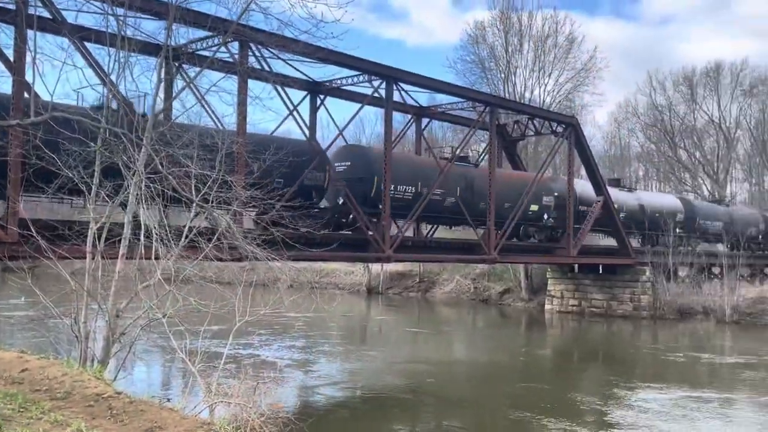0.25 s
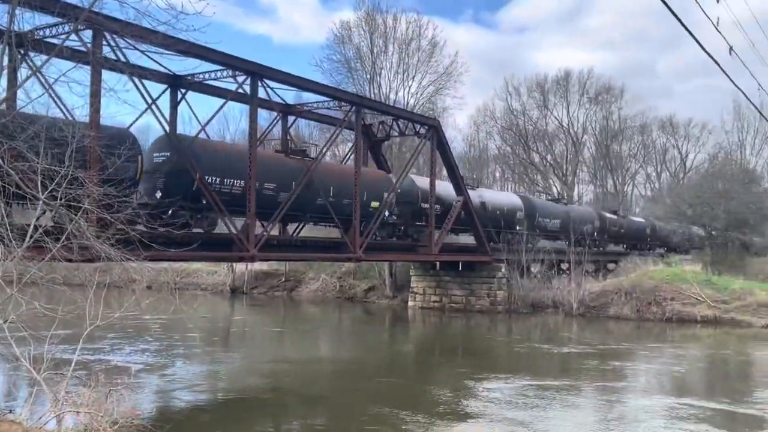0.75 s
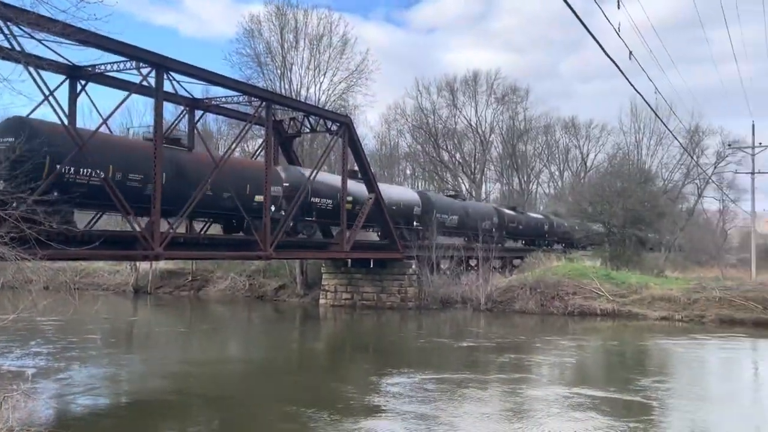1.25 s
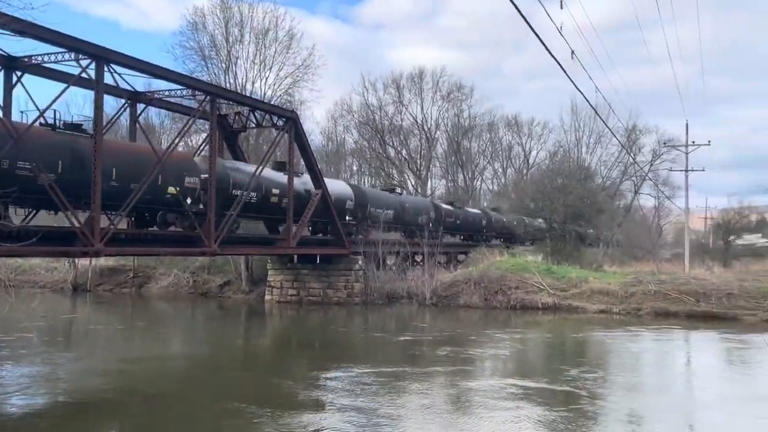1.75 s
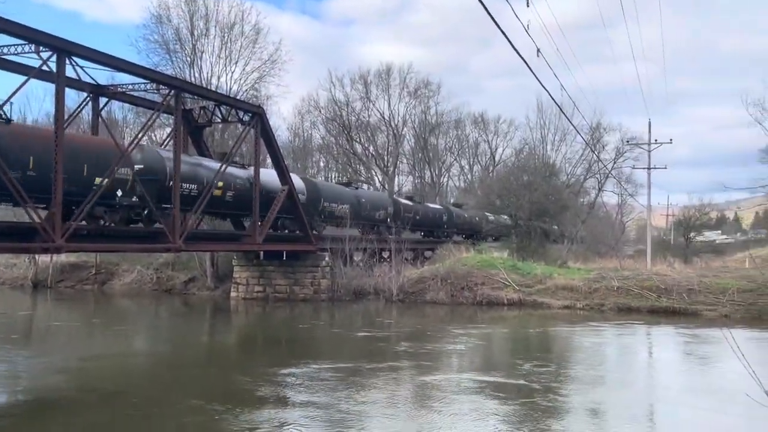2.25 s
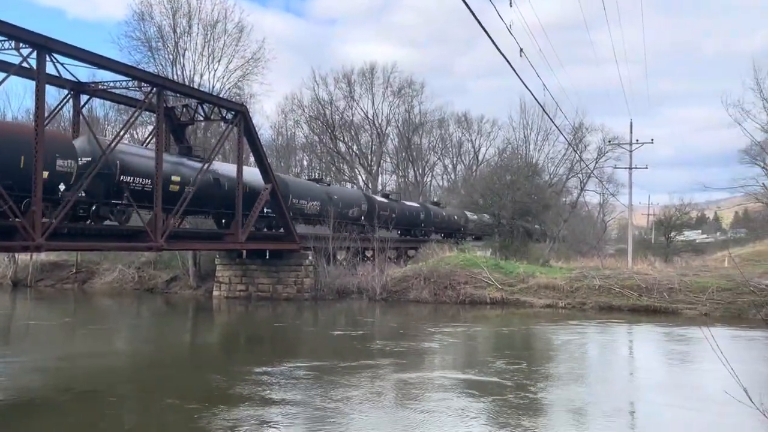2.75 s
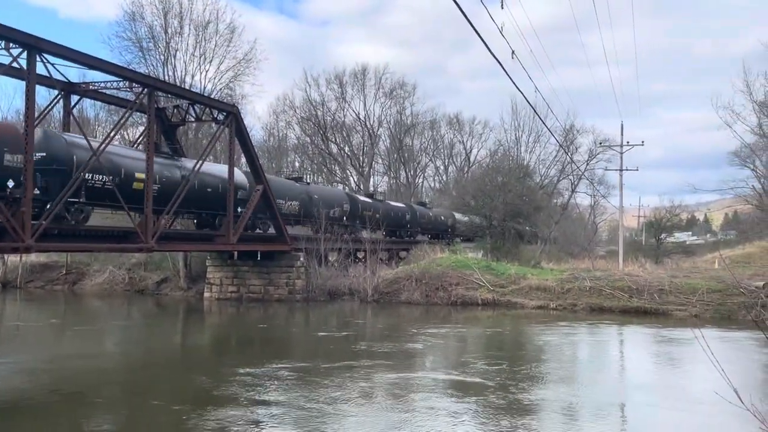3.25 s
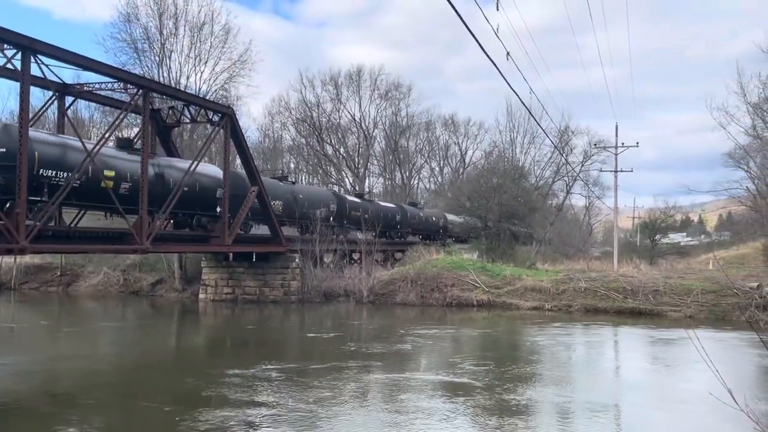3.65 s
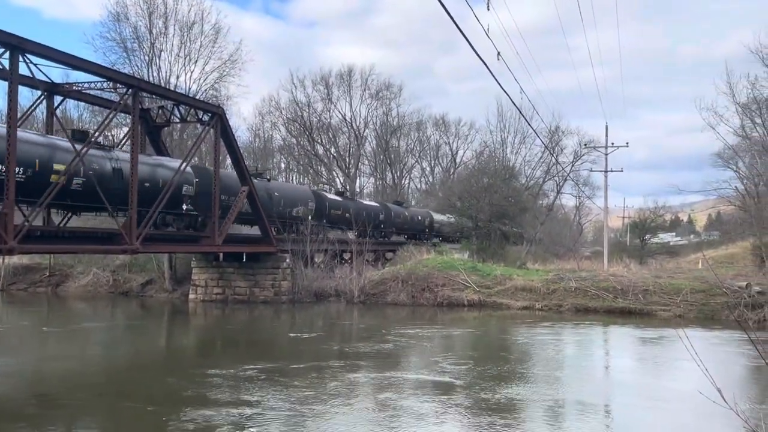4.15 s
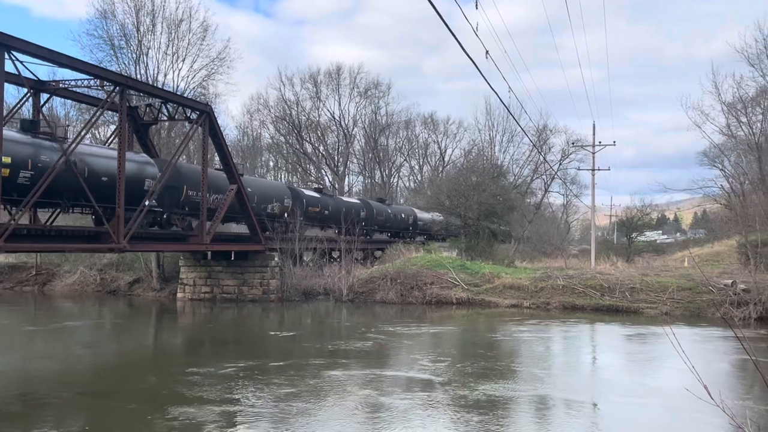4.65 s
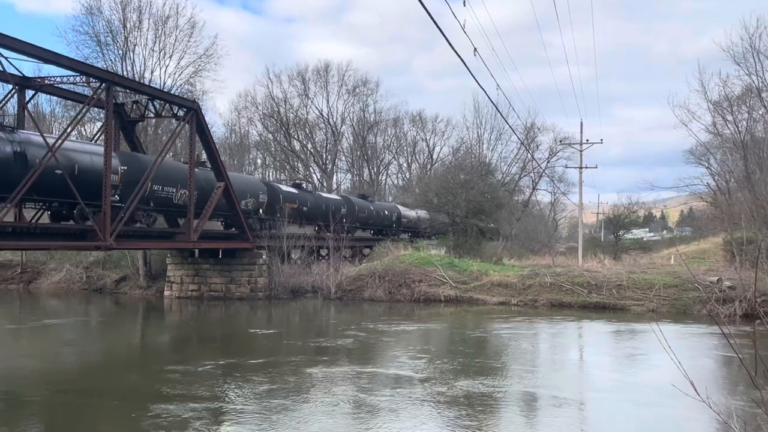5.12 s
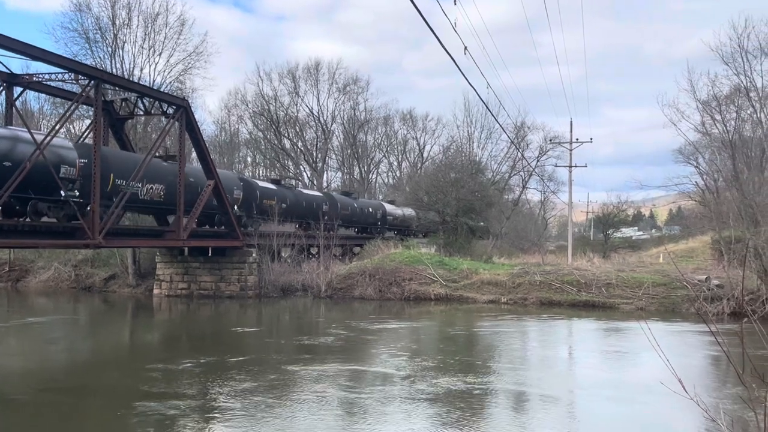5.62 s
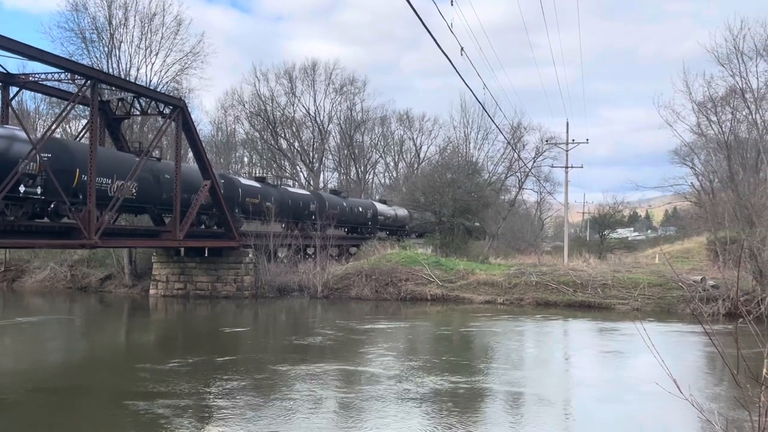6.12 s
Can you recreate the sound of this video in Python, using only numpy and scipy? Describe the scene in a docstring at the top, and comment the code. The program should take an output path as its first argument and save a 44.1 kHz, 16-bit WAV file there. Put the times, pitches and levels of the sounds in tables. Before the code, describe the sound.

A freight train of tank cars rolls across a steel bridge, heard outdoors from the river bank. A steady low rumble and wheel roar carry on throughout, with surges of metallic scraping and hiss, irregular clanks and light rattles. One hard knock stands out about a second in. Later the rumble swells with a cluster of clanks, and a faint, thin squeal follows near the end.

```python
"""On a river bank, a train of tank cars is heard rolling over a steel truss bridge.
Rough wheels and rails force the girders, running gear and wheels into vibration; sliding flanges scrape,
hiss and, by stick-slip, briefly squeal. Impacts excite free vibration: axles clank over rail joints,
couplers clink, loose chains rattle, and one hard knock stands out. The far bank scatters it all."""
import sys
import numpy as np
from scipy import signal
from scipy.fft import rfft, irfft
from scipy.io import wavfile
from scipy.ndimage import uniform_filter1d, map_coordinates

SR = 44100
rng = np.random.default_rng(int(sys.argv[2]) if len(sys.argv) > 2 else 0)


def wav_record(signal):
    """Record a signal, one row per channel, as 16-bit PCM in the file named by sys.argv[1]."""
    frames = np.transpose(np.atleast_2d(signal))
    bounded = np.clip(frames, -1, 1)
    # unit amplitude maps onto the largest positive 16-bit level
    quanta = np.round(bounded * 32767).astype(np.int16)
    wavfile.write(sys.argv[1], SR, quanta)


N = 281259
TIME = np.arange(N) / SR
FREQ = np.maximum(np.fft.rfftfreq(N, 1 / SR), 1)


def undb(db):
    """Decibels to amplitude ratio."""
    return 10 ** (np.asarray(db) / 20)


def unit(x):
    """Normalisation to rms 1."""
    return x / np.sqrt(np.mean(x ** 2))


def colour(x, spectrum):
    """Filtering by a spectral envelope of (f/Hz, level/dB) points."""
    hz, db = np.transpose(spectrum)
    return irfft(rfft(x) * undb(np.interp(np.log(FREQ), np.log(hz), db)), N)


def band(x, hz, width):
    """Second-order resonance with gain 1 at its centre."""
    return signal.lfilter(*signal.iirpeak(hz, hz / width, fs=SR), x)


def walk(cutoff_hz):
    """Random fluctuation: low-pass noise of rms 1."""
    return unit(irfft(rfft(rng.standard_normal(N)) / (1 + (FREQ / cutoff_hz) ** 4), N))


def free_modes(hz, t60_s, detune, t):
    """Free vibration: one damped sinusoid per mode, randomly detuned."""
    pitch = hz * (1 + detune * rng.standard_normal(len(hz)))
    return np.sin(2 * np.pi * np.outer(pitch, t)) * np.exp(-np.log(1000) * np.outer(1 / t60_s, t))


def swells(table, attack_s, release_s):
    """Envelopes that rise, hold and decay exponentially; one dB curve per lift column."""
    out = 0
    for start, length, *lifts in table:
        age = TIME - start
        shape = np.clip(age / attack_s, 0, 1) * np.exp(-np.maximum(age - length, 0) / release_s)
        out = out + np.outer(lifts, shape)
    return out


def shimmer(depth_db, width_hz, hold_s):
    """Amplitude modulation of noise by band: the steel's many small resonances swell and fade."""
    _, _, cells = signal.stft(rng.standard_normal(N), nperseg=1024)
    swell = rng.standard_normal(cells.shape)
    across = np.fft.fftfreq(cells.shape[0], SR / 1024)
    along = np.fft.fftfreq(cells.shape[1], 512 / SR)
    blur = np.exp(-(across[:, None] * width_hz) ** 2 - (along * hold_s) ** 2)
    swell = unit(np.fft.ifft2(np.fft.fft2(swell) * blur).real)
    return signal.istft(cells * undb(depth_db * swell))[1][:N]


def wander(x, drift, rate_hz=3):
    """Frequency modulation: moving contact points shift the resonances by the fraction drift."""
    slide = walk(rate_hz)
    position = np.arange(N) + np.cumsum(drift * (slide - slide.mean()))
    return map_coordinates(x, [position], order=3, mode="mirror")


def jolts(per_second=30, fade_s=0.024):
    """Shot noise: random bumps start at once and decay; rms 1."""
    bumps = (rng.random(N) < per_second / SR) * rng.uniform(0.31, 1, N)
    shake = signal.lfilter([1], [1, -np.exp(-1 / (fade_s * SR))], bumps)
    return unit(shake - shake.mean())


# sharp resonances of span and wheels: f/Hz, bandwidth/Hz, lift/dB
STEEL = [(122, 26, 4.5), (719, 55, 2.5), (2498, 18, 4), (4695, 25, 3)]
def contact(spectrum, roughness, jolt_db, chatter_db, chatter_hz, drift=0):
    """Forced vibration: roughness, modulated by the car's jolts and a part's own chatter, drives it."""
    force = roughness * undb(jolt_db + chatter_db * walk(chatter_hz))
    lift_db = sum(db / (1 + (2 * (FREQ - hz) / width) ** 2) for hz, width, db in STEEL)
    shake = colour(irfft(rfft(force) * undb(lift_db), N), spectrum)
    if drift:
        shake = wander(shake, drift)
    # the axle load is steady over a fraction of a second
    return shake / np.sqrt(uniform_filter1d(shake ** 2, size=6000))


# girder spectrum: f/Hz, level/dB
GIRDERS = [(15, -42), (30, -37), (42, -10), (52, -2.5), (80, 2.5), (110, 0), (140, -0.5), (175, -8),
           (260, -11.5), (600, -80)]
# loaded trucks and the gaps between them: t/s, duration/s, lift/dB
BOOMS = [(.18, .06, 0), (.27, 0.18, 6.5), (.58, .025, 6), (.755, 0.047, 2), (1.09, .05, -4),
         (1.19, 0.16, 1.5), (1.497, 0.098, 4), (1.63, 0.036, 4.5), (2.155, .025, 6), (2.36, 0.045, -4),
         (3.54, 0.064, -5), (3.75, 0.11, 6), (3.865, .06, 7), (3.96, .05, -2), (4.209, 0.029, 8),
         (4.325, 0.049, 10), (4.4, 0.07, 8.5), (4.533, 0.025, 13.5), (4.77, .05, -3), (5.05, 0.13, 4),
         (5.39, 0.047, -6), (5.74, 0.065, -4), (5.835, 0.069, 7), (5.94, .03, 3.5), (6.07, 0.037, -4)]
def girders(level_db, jolt):
    """Response to a moving load: the span booms under a truck and rests between trucks."""
    boom_db, = swells(BOOMS, attack_s=0.011, release_s=0.023)
    roughness = shimmer(depth_db=1.0, width_hz=60, hold_s=0.41)
    return undb(level_db + boom_db) * contact(GIRDERS, roughness, jolt, chatter_db=1.0, chatter_hz=22)


# running gear spectrum: f/Hz, level/dB
GEAR = [(90, -18), (190, -1), (240, -2.5), (330, 1.5), (480, -2.5), (620, -0.5), (740, -3.5), (1100, -66),
        (2500, -78)]
def running_gear(level_db, jolt):
    """Forced vibration of loose parts: a low, drifting rattle."""
    roughness = shimmer(depth_db=1.86, width_hz=120, hold_s=0.041)
    shake = contact(GEAR, roughness, 0.66 * jolt, chatter_db=0.66, chatter_hz=60, drift=.03)
    return undb(level_db) * shake


# wheel spectrum: f/Hz, level/dB
WHEELS = [(350, -25), (620, -23), (735, -4), (825, -4.5), (950, 3), (1170, -0.5), (1320, -9.5),
          (1480, -11.5), (1680, -29), (3000, -51.5)]
def wheels(level_db, jolt):
    """Rolling noise: roughness drives the wheels to a midrange roar."""
    roughness = shimmer(depth_db=2.0, width_hz=160, hold_s=0.069)
    shake = contact(WHEELS, roughness, 0.5 * jolt, chatter_db=0.5, chatter_hz=41, drift=.014)
    return undb(level_db) * shake


# scrape spectrum: f/Hz, level/dB
FLANGES = [(700, -20), (1300, 5.5), (1680, -1.5), (1920, 2), (2150, -1.5), (2500, -1), (3100, -7),
           (4200, -11.5), (5500, -22), (9000, -49)]
def flanges(level_db, jolt):
    """Sliding friction: flanges scrape along the rail."""
    roughness = shimmer(depth_db=2.5, width_hz=168, hold_s=0.062)
    shake = contact(FLANGES, roughness, 0.18 * jolt, chatter_db=0.4, chatter_hz=63, drift=.005)
    return undb(level_db) * shake


# hiss spectrum: f/Hz, level/dB
HISS = [(2000, -23), (3600, -2.5), (5000, 0), (6000, 0), (7000, -1), (8500, -7.5), (10000, -18.5),
        (13000, -38)]
def hiss(level_db, jolt):
    """Friction noise: the treble of the sliding flanges."""
    roughness = shimmer(depth_db=3.0, width_hz=200, hold_s=0.11)
    return undb(level_db) * contact(HISS, roughness, jolt, chatter_db=0.3, chatter_hz=76)


# sizzle spectrum: f/Hz, level/dB
SIZZLE = [(5000, -12), (7500, -6), (8800, 5.5), (10000, -2), (11300, -7), (13000, -19), (14000, -29)]
# its slow envelope: t/s, level/dB
SIZZLE_LEVEL = [(0, -58), (.4, -65), (.9, -64.5), (1.5, -59.5), (2.3, -63.5), (2.7, -64), (3.15, -59.5),
                (3.5, -60.5), (3.9, -67.5), (4.45, -68.5), (5.3, -61.5), (6.22, -55), (6.38, -61)]
def sizzle(lift_db):
    """Friction noise at its finest: a smooth, high hiss that swells as trucks pass."""
    grain = shimmer(depth_db=1.3, width_hz=200, hold_s=0.063)
    level_db = np.interp(TIME, *np.transpose(SIZZLE_LEVEL)) + lift_db + 1.2 * walk(25)
    return undb(level_db) * unit(colour(grain, SIZZLE))


# lighter and heavier cars crossing: t/s, then level/dB of girders, gear, wheels, flanges, hiss
PASSING = [(0, -41, -44, -37, -42.5, -54), (.35, -43.5, -41, -41, -44, -53), (.75, -39, -42, -41, -46, -54),
           (1, -38, -44.5, -40.5, -46.5, -58), (1.45, -39.5, -45, -39, -45, -52.5),
           (1.95, -41, -46, -41.5, -46.5, -56.5), (2.32, -43.5, -45.5, -39.5, -51, -59.5),
           (2.85, -43, -47, -39, -48.5, -58), (3.55, -44, -48.5, -38.5, -51, -61.5),
           (3.75, -40.5, -45, -40, -47, -57.5), (4.1, -40, -38.5, -39.5, -45, -55),
           (4.45, -38.5, -36.5, -38, -41, -56), (4.72, -38, -37.5, -36.5, -40.5, -51.5),
           (5.27, -40.5, -42, -38, -47.5, -57), (5.6, -40, -42.5, -39.5, -44.5, -54),
           (6.22, -35, -36, -36.5, -40, -49), (6.38, -36, -42, -42.5, -41, -50.5)]
# trucks on rough rail: t/s, duration/s, then lift/dB of roar, scrape, sizzle
SURGES = [(.1, 0.057, 3.5, 2.2, 6), (.27, 0.024, 2, 3, 1), (.495, 0.083, 4.5, 2.8, 5.5),
          (.626, 0.038, 4.5, 0.8, 4), (.837, 0.17, 5.5, 2.5, 2), (1.124, 0.15, 5, 3, 1.5),
          (1.533, 0.052, 4.5, 1.7, 3), (1.711, 0.064, 4, 2.9, 2), (2.005, 0.091, 3, 8.4, 7.5),
          (2.11, 0.048, 7, 5.3, 3), (2.401, 0.12, 2.5, 5.2, 7.5), (2.615, .02, 3, 1.5, 9),
          (2.685, 0.023, 0.5, 3, -6), (2.775, 0.11, 2.5, 2.5, 3), (2.98, 0.22, 2.6, 0.7, 2),
          (3.24, 0.16, 4.8, 2.2, 2), (3.595, 0.14, 6.5, 3.3, 2.5), (3.738, 0.075, 5.5, 4.5, 5.5),
          (3.966, 0.023, 4.5, 4.8, 11), (4.06, 0.1, 2.5, 1.4, -4), (4.185, 0.15, 1.5, 6.5, 11.5),
          (4.52, 0.076, 2.5, 1.6, 3), (4.812, 0.062, 1.5, 3.7, 3), (4.912, 0.093, 3.5, 4.6, 6.5),
          (5.059, 0.054, 1.5, 4.9, 6.5), (5.161, 0.06, 0.5, 4.5, 6.5), (5.3, 0.14, 3.5, 3.2, 5),
          (5.425, 0.13, 1, 2.6, 3.5), (5.666, 0.072, 2, 4.7, 4), (5.795, 0.039, 6.5, 0.42, -1),
          (5.884, 0.034, 3.5, 1.3, 2), (6.14, 0.16, 3.5, 2.1, 0.5)]
def rolling():
    """Superposition of the continuous sources, whose levels follow load and rail roughness."""
    times, *columns = np.transpose(PASSING)
    rumble_db, gear_db, roar_db, scrape_db, hiss_db = (np.interp(TIME, times, c) for c in columns)
    roar_lift, scrape_lift, sizzle_lift = swells(SURGES, attack_s=0.015, release_s=0.029)
    jolt = jolts()
    return (girders(rumble_db + 1.23, jolt)
            + running_gear(gear_db + 0.89 * roar_lift + 0.58, jolt)
            + wheels(roar_db + roar_lift - 0.17, jolt)
            + flanges(scrape_db + scrape_lift + 1.16, jolt)
            + hiss(hiss_db + 0.94 * scrape_lift + 1.04, jolt)
            + sizzle(sizzle_lift))


# wheel modes excited by a slipping flange: start t/s, end t/s, f/Hz, level/dB
SQUEALS = [(0, .13, 3512, -54), (.11, .25, 4692, -46), (.15, .38, 4645, -50), (.11, .31, 7397, -54.5),
           (.15, .28, 7310, -55), (.11, .25, 6546, -59), (.1, .27, 9002, -59), (.11, .28, 10700, -67),
           (5.16, 5.55, 5782, -59.5), (5.42, 5.95, 5782, -62), (5.42, 5.7, 5700, -60),
           (5.46, 5.74, 2498, -48), (6.19, 6.33, 11314, -62.5)]
def squeals(waver=0.0016, flutter_db=2.5, catch_s=0.045, rough=0.4, rough_hz=110, sag=.004):
    """Stick-slip oscillation: a single wheel mode catches, grates, wavers, sags and fades."""
    out = 0
    for start, end, hz, db in SQUEALS:
        progress = np.clip((TIME - start) / (end - start), 0, 1)
        swell = np.clip((TIME - start) / catch_s, 0, 1) * np.cos(np.pi / 2 * progress)
        pitch = hz * (1 + waver * walk(100) + sag * (.5 - progress))
        phase = 2 * np.pi * np.cumsum(pitch) / SR
        grating = np.sin(phase) + rough * walk(rough_hz) * np.cos(phase)
        out = out + swell * undb(db + flutter_db * walk(35)) * np.sqrt(2) * grating
    return out


# axles over joints: t/s, level/dB, centre f/Hz, duration/s
CLANKS = [(0.279, -31, 910, .019), (0.434, -33, 1050, .015), (0.644, -29.5, 690, 0.011),
          (.661, -31.5, 530, 0.01), (.764, -30.5, 960, 0.008), (0.78, -33, 650, .01),
          (0.926, -26.5, 790, 0.0071), (.939, -30.5, 700, 0.014), (1.005, -29, 660, 0.015),
          (1.866, -32.5, 680, 0.02), (2.04, -33, 980, 0.054), (2.134, -36, 760, 0.015),
          (2.404, -29.5, 920, 0.015), (2.421, -33, 820, 0.03), (2.512, -29, 940, 0.025),
          (2.623, -33.5, 960, 0.011), (2.776, -36, 920, 0.025), (2.898, -36, 910, 0.022),
          (2.994, -33, 970, 0.013), (3.002, -32, 527, 0.013), (3.053, -31, 990, 0.0096),
          (3.283, -33.5, 734, 0.018), (3.359, -37, 980, 0.024), (3.657, -33.5, 806, 0.017),
          (3.66, -35, 510, 0.015), (3.996, -27.5, 550, 0.014), (4.149, -32, 1000, 0.015),
          (4.467, -31.5, 710, 0.015), (4.525, -26.5, 616, 0.0089), (4.564, -29.5, 930, 0.013),
          (4.606, -22.5, 590, 0.0052), (4.831, -32, 710, 0.031), (4.897, -30, 675, .012),
          (4.936, -28, 1000, 0.026), (4.944, -29.5, 327, 0.045), (5.455, -29, 1080, .005),
          (5.469, -26.8, 670, 0.02), (5.806, -29, 855, 0.026), (6.101, -32, 420, .02),
          (6.18, -30.5, 500, 0.019)]
# bogie modes: f/Hz, level/dB, T60/s
BOGIE = [(331.5, 2, 0.28), (425, -4, 0.22), (530.4, 2, 0.2), (636, -2.5, .16), (718.6, 1, 0.32),
         (809, -2, .2), (980, 3, 0.15), (1138, 3, 0.13), (1960, 6, .12), (2380, 2, .1)]
def joint_clanks(ring_share=.65, focus_hz=170, width_hz=300, tail_db=-16, tail_s=0.065, crack_db=-21):
    """Impact excitation: a wheel drops at a joint and rings the bogie, with a rattle and a crack."""
    out, t = np.zeros(N + SR), np.arange(SR // 2) / SR
    mode_hz, mode_db, t60_s = np.transpose(BOGIE)
    for onset_s, db, hz, length_s in CLANKS:
        rattle, grit = rng.standard_normal((2, len(t)))
        modes = free_modes(mode_hz, t60_s, detune=.02, t=t)
        weights = undb(mode_db) / (1 + ((mode_hz - hz) / focus_hz) ** 2)
        weights *= rng.choice([-1, 1], len(mode_hz))
        ring = weights @ modes * (1 - np.exp(-t / (.07 * length_s))) * np.exp(-t / (2.4 * length_s))
        rise = 1 - np.exp(-t / (0.16 * length_s))
        envelope = rise * (np.exp(-(t / length_s) ** 2) + undb(tail_db) * np.exp(-t / tail_s))
        rattle = band(band(rattle * envelope, hz, width_hz), hz, 3 * width_hz)
        # ring and rattle share the energy
        body = sum(part * np.sqrt(share * length_s * SR / np.sum(part ** 2))
                   for part, share in [(ring, ring_share), (rattle, 1 - ring_share)])
        crack = unit(band(band(grit, 1300, 1900), 2000, 4400)) * envelope
        start = int(onset_s * SR)
        out[start:start + len(t)] += undb(db - 0.2) * (body + undb(crack_db) * crack)
    return span(out[:N])


def span(blows, level_db=-9, rise_s=.02, t60_s=.38):
    """Structural reverberation: a blow runs along the girders, which build up and ring on."""
    t = np.arange(SR // 2) / SR
    response = rng.standard_normal(len(t)) * (1 - np.exp(-t / rise_s)) * np.exp(-np.log(1000) * t / t60_s)
    return blows + undb(level_db) * signal.fftconvolve(blows, response / np.linalg.norm(response))[:N]


# transmission through the air: f/Hz, gain/dB
AIR = [(4500, 0.5), (6500, -4), (8000, -14), (12000, -28)]
def air_absorption(x):
    """Absorption: distance dulls the treble."""
    return colour(x, AIR)


# couplers and fittings striking: t/s, level/dB, clatter duration/s, tilt/(dB per octave)
CLINKS = [(0.298, -41.5, .018, 0), (0.433, -40.5, .014, 2), (1.003, -42, .014, -5), (1.543, -45, .014, -2),
          (1.868, -47, 0.018, 1), (2.402, -44, 0.011, -1), (2.623, -46, 0.011, -1),
          (3.181, -41.5, 0.014, -3), (3.262, -45, .014, -5), (3.764, -40, .015, -7), (3.973, -44, .018, 8),
          (4.133, -41, .018, -7), (4.207, -47, 0.023, 8), (4.825, -34.5, 0.015, 3), (6.093, -36, 0.02, 4)]
# modes of a fitting: f/Hz, level/dB, T60/s
FITTING = [(1546, -3, 0.046), (1823, 3, 0.06), (2100, 1, 0.064), (2380, -4, .06), (2700, -5.5, 0.053),
           (3570, -4, .05), (4120, -6, .04), (4400, -11, .04), (5150, -11, .03), (5800, -10, .03),
           (6630, -10, .03)]
def clinks(bounces_per_s=550, bounce_db=-5, crack_db=-6, crack_s=0.0025):
    """Impact and rebound: a hard blow and quick bounces excite a fitting's impulse response."""
    out, t = np.zeros(N + SR), np.arange(SR // 5) / SR
    hz, mode_db, t60_s = np.transpose(FITTING)
    for onset_s, db, length_s, tilt_db in CLINKS:
        body = undb(mode_db + tilt_db * np.log2(hz / hz[0])) @ free_modes(hz, t60_s, detune=0.0343, t=t)
        crack = unit(band(rng.standard_normal(len(t)), 3500, 3600)) * np.exp(-t / crack_s)
        bounces = (rng.random(len(t)) < bounces_per_s / SR) * rng.uniform(-1.1, 1, len(t))
        force = bounces * undb(bounce_db) * np.exp(-(t / (2 * length_s)) ** 2)
        force[0] = 1  # the first blow
        ring = signal.fftconvolve(force, body + undb(crack_db) * crack)[:len(t)]
        start = int(onset_s * SR)
        out[start:start + len(t)] += undb(db) * ring / np.sqrt(np.sum(ring ** 2) / (length_s * SR))
    return air_absorption(out[:N])


# shaken chains and fittings: t/s, level/dB, centre f/Hz, bandwidth/Hz, duration/s
RATTLES = [(0.48, -47, 4300, 1900, 0.2), (1.283, -48, 2430, 400, 0.33), (2.445, -51, 2680, 500, 0.11),
           (2.803, -42, 1830, 260, .045), (2.805, -43.5, 3100, 2200, .04), (4.205, -38.5, 2750, 420, 0.047),
           (4.274, -40, 2720, 550, 0.08), (4.277, -42.5, 3550, 170, 0.073), (5.404, -46, 2970, 450, 0.21),
           (5.47, -45, 2460, 170, 0.18)]
def rattles(rise_s=0.0055, chatter_db=1.5, hits_per_s=900):
    """Random impact excitation: a run of small hits rings one resonance of loose steel and tails off."""
    out, t = np.zeros(N + SR), np.arange(SR // 2) / SR
    chatter = undb(chatter_db * walk(120))
    for onset_s, db, hz, width, length_s in RATTLES:
        hits = (rng.random(len(t)) < hits_per_s / SR) * rng.choice([-1, 1], len(t))
        force = hits * rng.uniform(.5, 1, len(t))
        ring = unit(band(band(force, hz, width), hz, 2 * width))
        envelope = (1 - np.exp(-t / rise_s)) * np.exp(-(t / length_s) ** 2)
        start = int(onset_s * SR)
        out[start:start + len(t)] += undb(db) * ring * envelope
    return air_absorption(out[:N] * chatter)


# components of the knock and its thud: t/s, f/Hz, peak level/dB, rise time/s
KNOCK = [(1.1617, 825, -7, 0.0014), (1.1625, 712, -19, 0.0045), (1.162, 1420, -24, .0013),
         (1.166, 167, -21.5, 0.003), (1.3, 89, -21.5, .005), (1.163, 50, -32, 0.025)]
def knock():
    """Heavily damped vibration: one hard blow gives a few midrange cycles, then a low thud."""
    out = 0
    for onset_s, hz, db, rise_s in KNOCK:
        t = np.maximum(TIME - onset_s, 0)
        envelope = (t / rise_s * np.exp(1 - t / rise_s)) ** 2
        out = out + undb(db) * envelope * np.sin(2 * np.pi * hz * t)
    return out


# scattered sound relative to direct sound: f/Hz, level/dB
SCATTER = [(100, -68), (400, -66), (620, -57), (830, -25), (1100, -13.5), (1380, -5.5), (1550, -6),
           (1720, -4), (2100, -8.5), (2800, -14.5), (4000, -28), (4800, -24.5), (6100, -32), (6500, -18),
           (7500, -19), (8150, -45), (9000, -18), (10200, -16), (11300, -30), (12300, -28), (13000, -12)]
def bank_echoes(direct, t60_s=0.12, shift_hz=8):
    """Diffuse scattering off trusses, trees and water; the paths shift as the cars move."""
    t = np.arange(SR // 2) / SR
    response = rng.standard_normal(len(t)) * np.exp(-np.log(1000) * t / t60_s)
    echoes = signal.fftconvolve(direct, response / np.linalg.norm(response))[:N]
    shifted = signal.hilbert(echoes) * np.exp(1j * np.pi * walk(shift_hz))
    return colour(shifted.real, SCATTER)


def scene():
    """Superposition: the train straight ahead, widened by echoes in antiphase left and right."""
    direct = rolling() + joint_clanks() + clinks() + rattles() + squeals() + knock()
    return direct + np.array([[1], [-1]]) * bank_echoes(direct)


# phase difference of the two microphone ports: f/Hz, lead of left/rad
PORT_PHASE = [(0, 0), (780, 0), (1120, .55), (1460, 0), (1650, 0), (1750, 1.2), (1880, -.4), (2500, .1),
              (6150, 0), (6400, -.55), (7000, -1.3), (8150, -3.14), (10000, -4.9), (11000, -6.28),
              (12900, -6.28), (13600, -8.9)]
# their sensitivity difference: f/Hz, left minus right level/dB
PORT_BALANCE = [(500, 0), (820, -1.5), (960, -3), (1200, 2.5), (1560, 1), (1700, -2), (1880, 1.5),
                (2600, 1.5), (5500, -0.3)]
def record(dry):
    """Frequency response: two microphone ports differ in phase and level; a low-pass cuts the top."""
    lead = np.interp(FREQ, *np.transpose(PORT_PHASE))
    lean_db = np.interp(FREQ, *np.transpose(PORT_BALANCE))
    half = np.array([[.5], [-.5]])
    ports = irfft(rfft(dry) * np.exp(1j * half * lead) * undb(half * lean_db), N)
    return signal.sosfilt(signal.ellip(12, .2, 80, 13750, fs=SR, output="sos"), ports)


dry = scene()
out = record(dry)
wav_record(out)
```